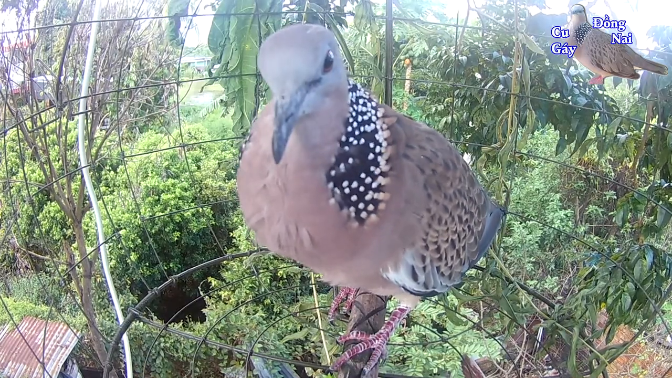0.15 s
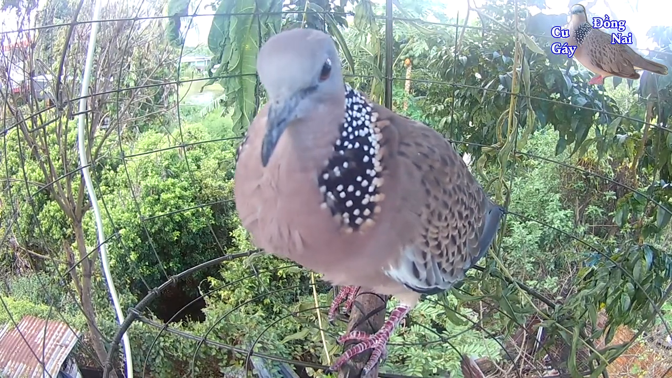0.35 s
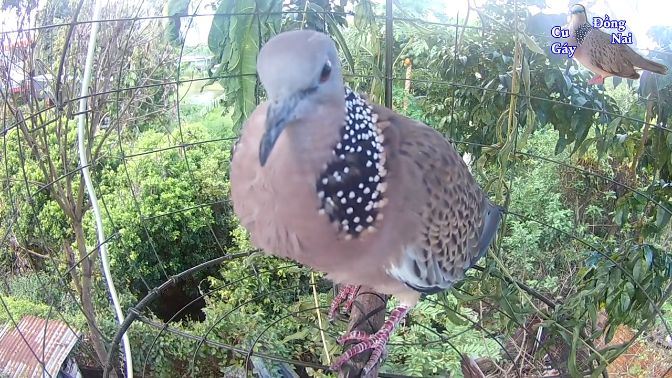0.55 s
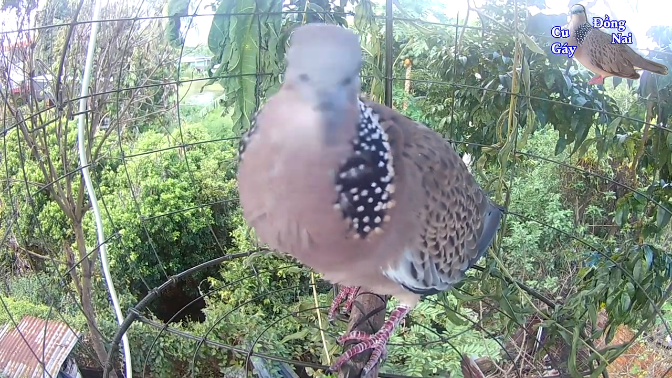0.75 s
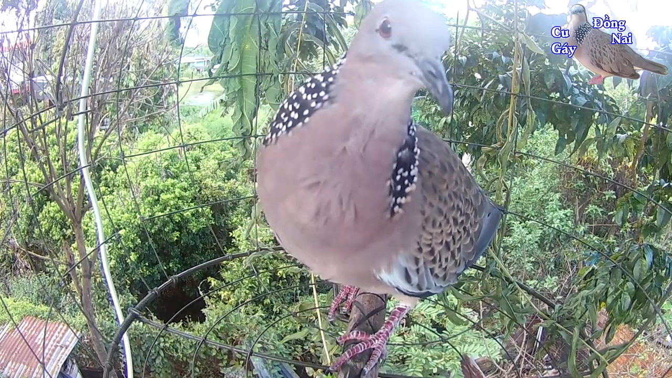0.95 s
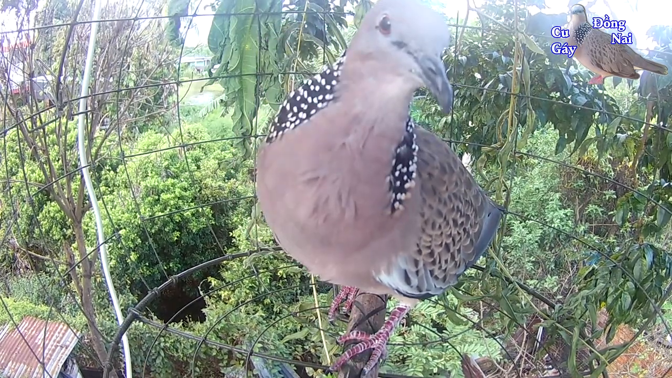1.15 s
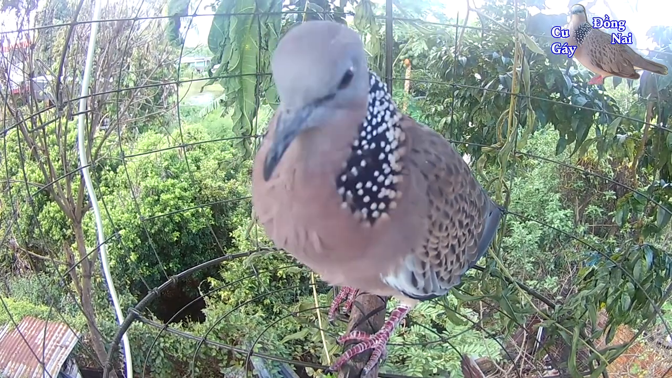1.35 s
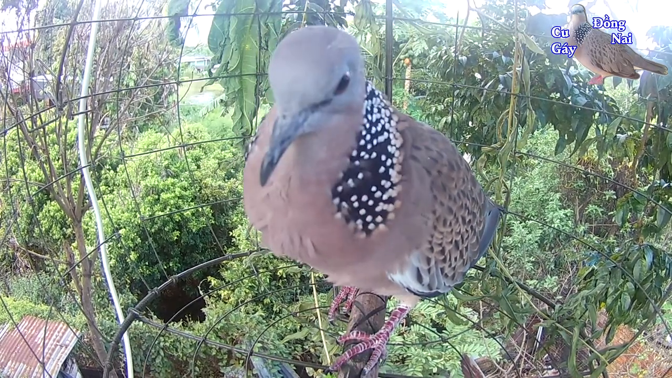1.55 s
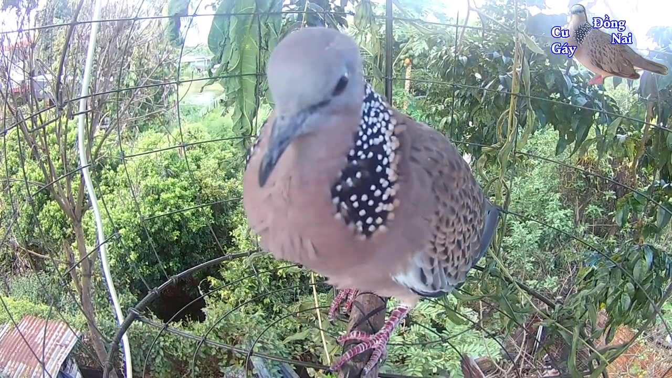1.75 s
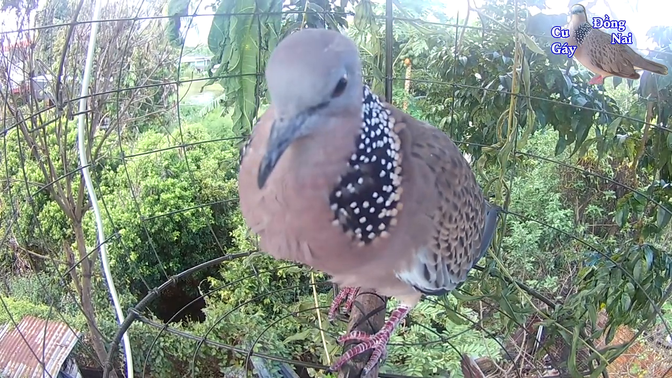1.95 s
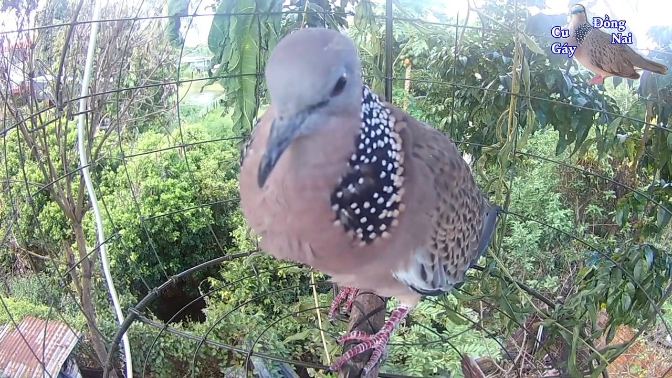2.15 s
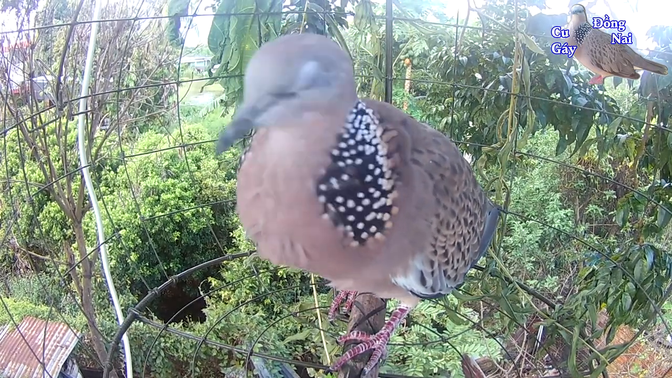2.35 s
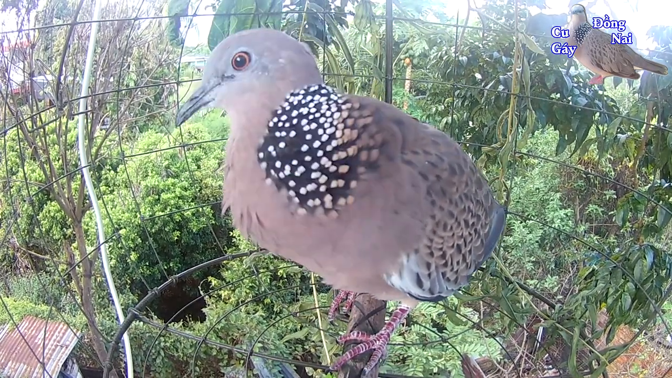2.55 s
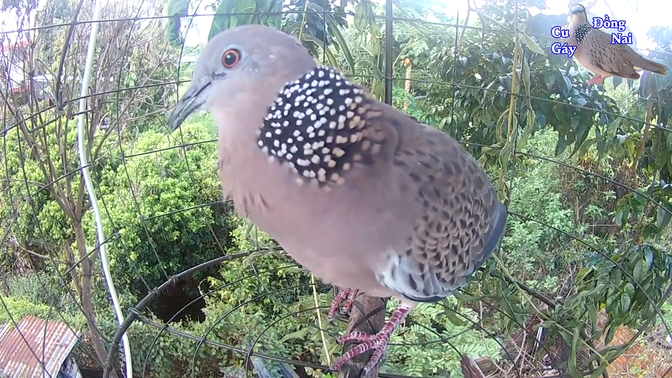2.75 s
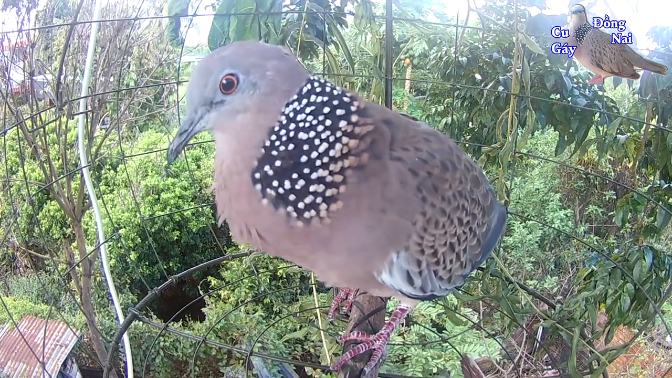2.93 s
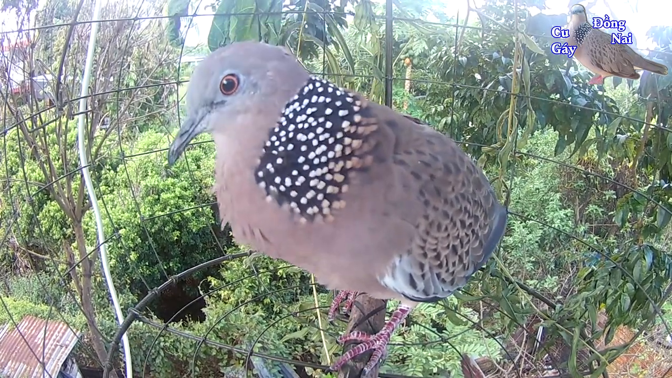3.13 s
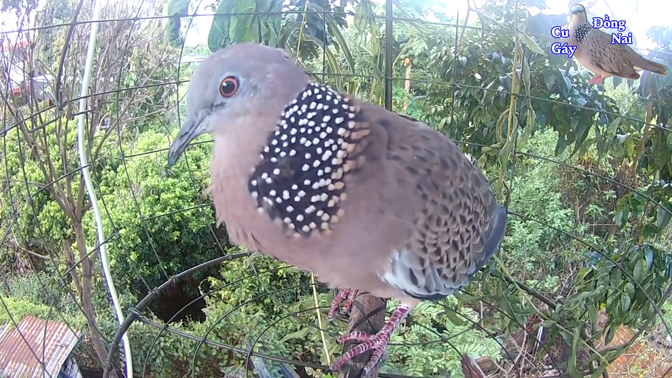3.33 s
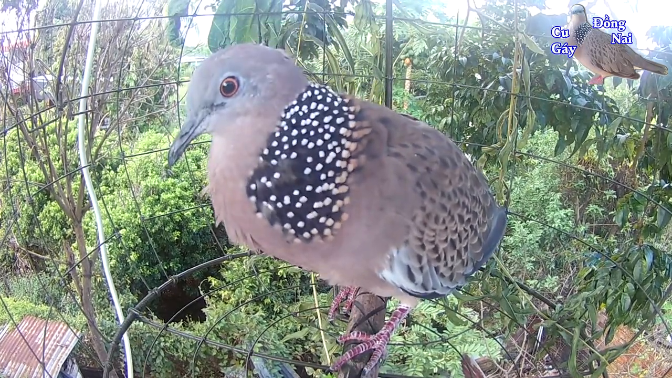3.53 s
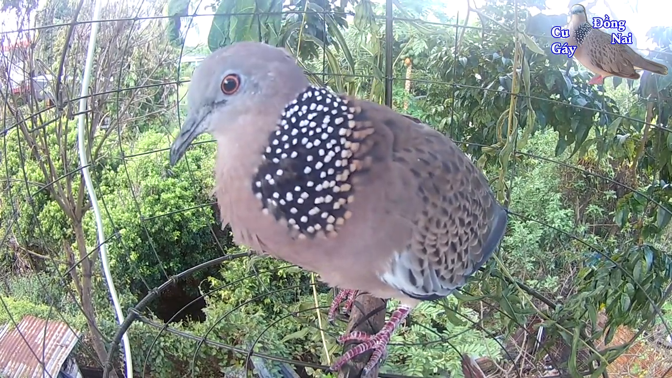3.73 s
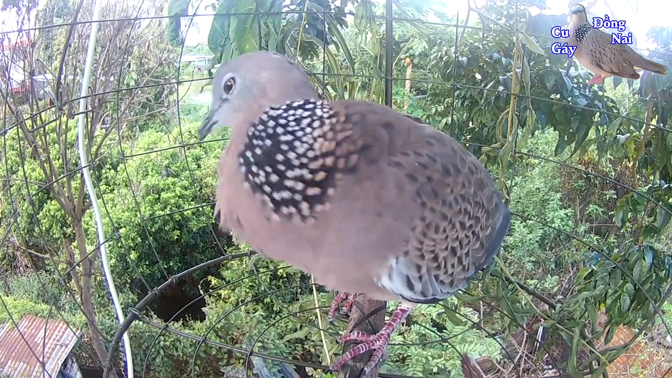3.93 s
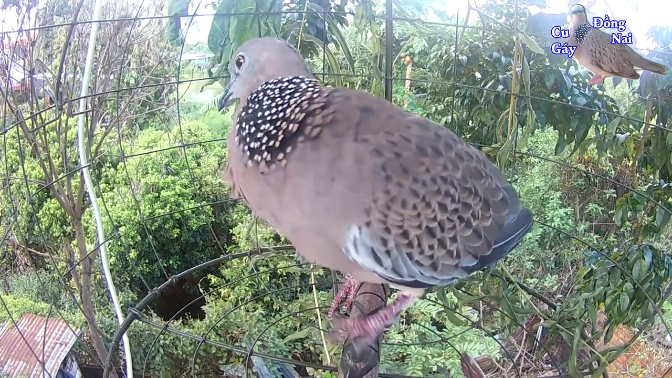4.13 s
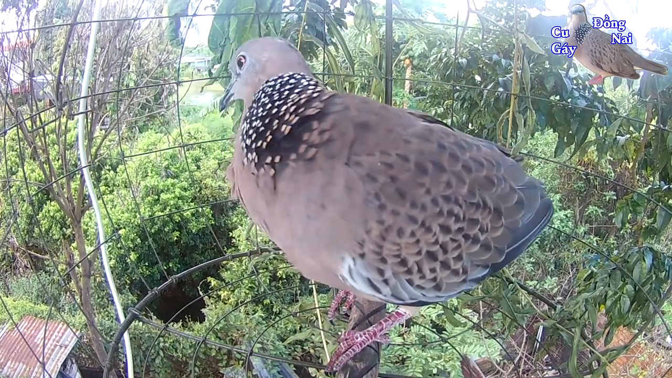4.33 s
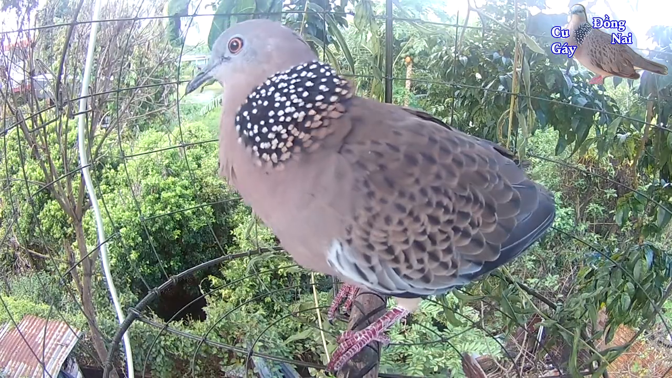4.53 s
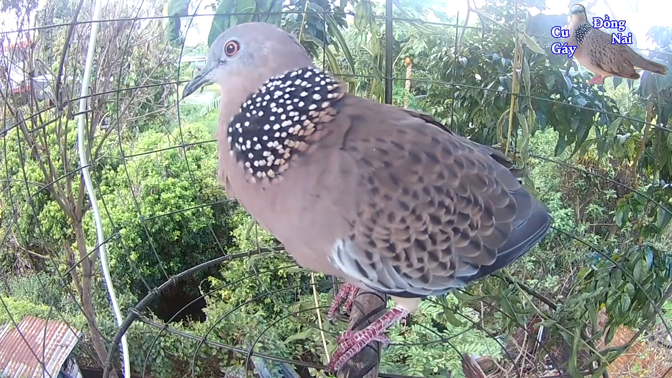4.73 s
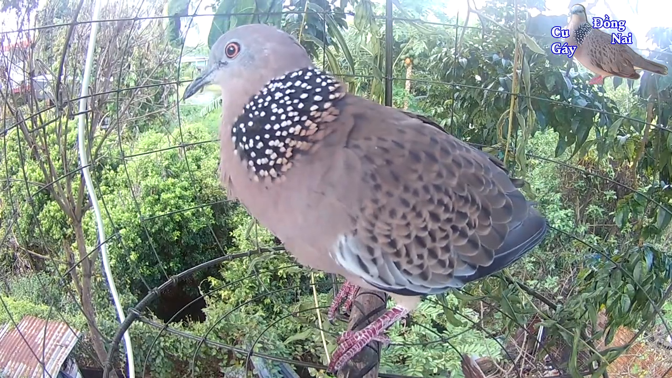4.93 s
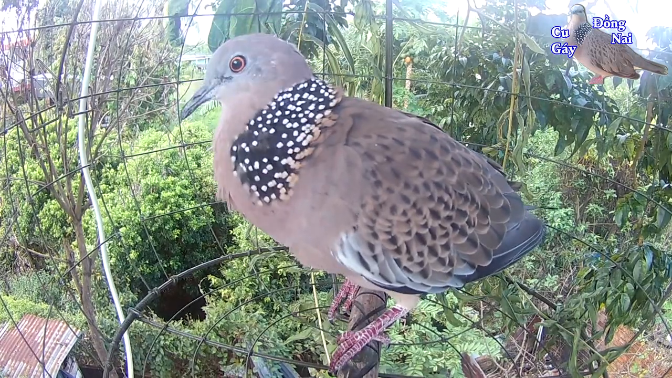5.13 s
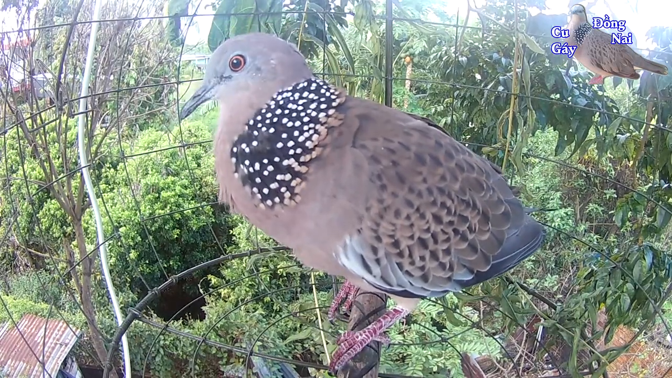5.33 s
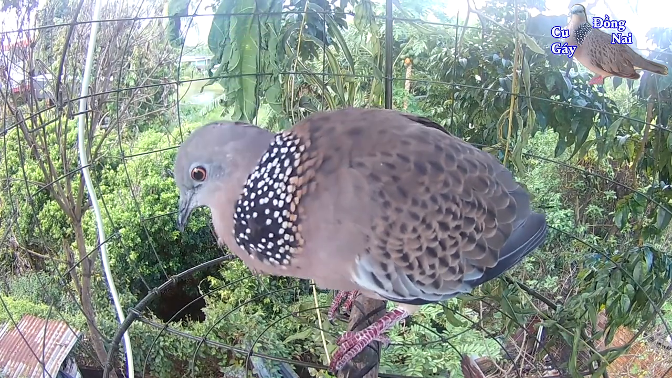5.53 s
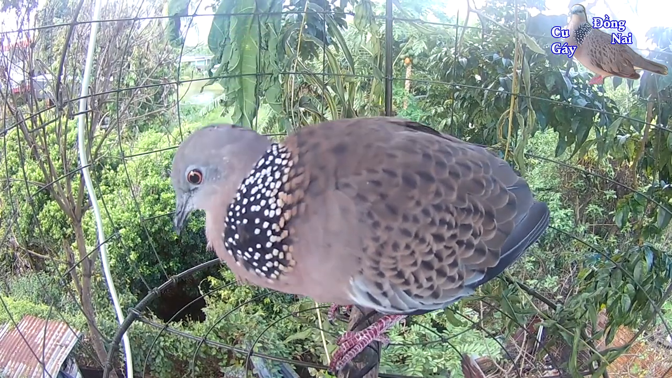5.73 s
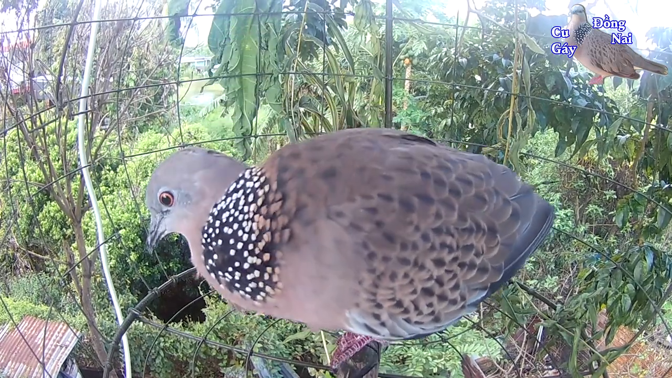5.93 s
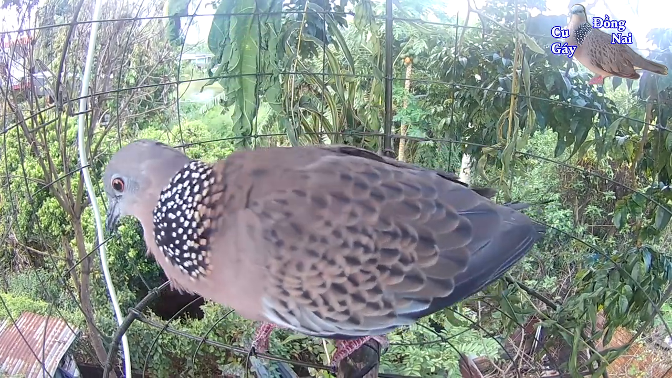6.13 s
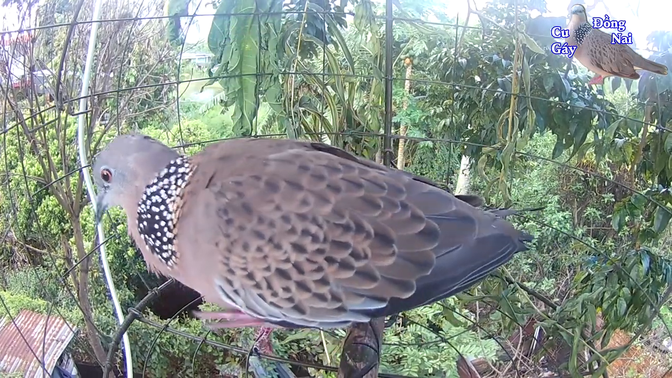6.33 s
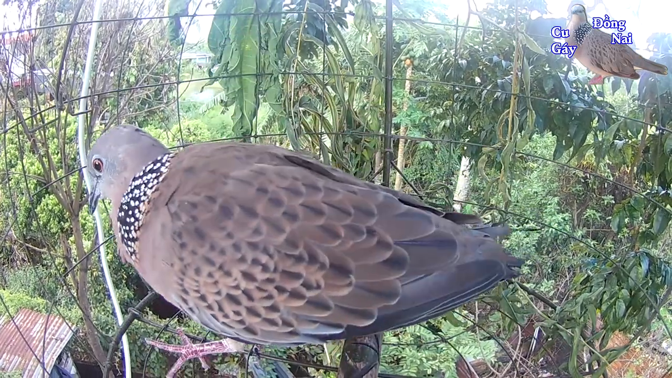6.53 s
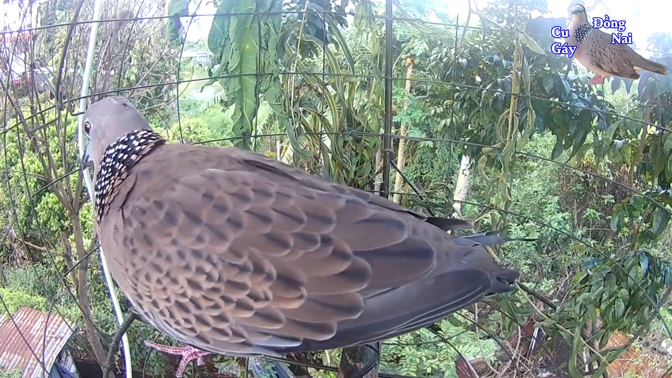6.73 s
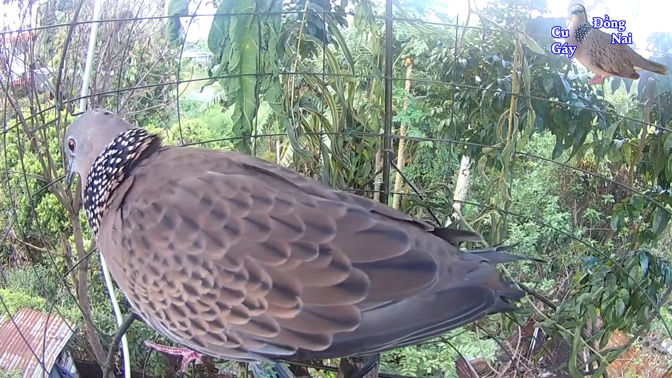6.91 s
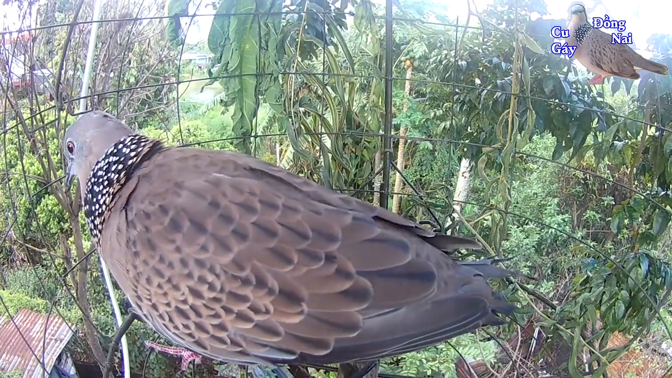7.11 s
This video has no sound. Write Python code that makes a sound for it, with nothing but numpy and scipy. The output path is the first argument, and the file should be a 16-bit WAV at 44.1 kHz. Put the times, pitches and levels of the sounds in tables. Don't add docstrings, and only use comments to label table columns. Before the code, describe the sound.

A spotted dove coos very close to the microphone, loud and hollow: a short hoot, a quick rising note, then a longer throbbing fall. The phrase repeats four times, the fourth softer, and a fifth starts at the end. Fainter doves answer in the gaps. Far off a cock crows hoarsely at the start and end. Feet tap the wooden perch and shake cage wires, over a soft hush of leaves and traffic.

```python
import sys
import numpy as np
from scipy import signal
from scipy.fft import rfft, irfft
from scipy.io import wavfile
from scipy.ndimage import uniform_filter1d

SR = 44100
rng = np.random.default_rng(int(sys.argv[2]) if len(sys.argv) > 2 else 0)


def transcribe(signal):
    frames = np.atleast_2d(signal).T
    limited = np.clip(frames, -1, 1)
    pcm = np.round(limited * 32767).astype(np.int16)
    wavfile.write(sys.argv[1], SR, pcm)


def rack_gain(trim_db):
    fader = np.asarray(trim_db, float)
    return 10 ** (fader / 20)


N = 316197
TIME = np.arange(N) / SR

# start t/s, length t/s, top pitch f/Hz, crest level/dB
HOOT_NOTES = [
    (-.122, 0.068, 605, -9),
    (1.324, 0.12, 603.9, -6),
    (2.822, 0.13, 610.4, -7),
    (4.548, .13, 595, -11),
    (6.868, .132, 622.4, -11.5),
]
# t/s, wood level/dB, wire level/dB
FOOT_KNOCKS = [(4.24, -9.5, -54), (4.266, -54, -52.5), (4.279, -67, -43), (4.303, -75, -55),
               (4.71, -66, -66.5), (4.87, -59, -62.5), (5.744, -48, -61.5), (5.956, -49, -53),
               (5.963, -66, -54.5), (6.032, -40, -67), (6.045, -33, -48), (6.059, -16.5, -26),
               (6.361, -48, -47), (6.504, -35, -83.5), (6.514, -31.5, -66), (6.758, -37, -66)]


def peak(x, hz, width_hz):
    r = np.exp(-np.pi * width_hz / SR)
    top = [(1 - r * r) / 2, 0, (r * r - 1) / 2]
    return signal.lfilter(top, [1, -2 * r * np.cos(2 * np.pi * hz / SR), r * r], x)


def edge_filter(x, order, hz, kind):
    return signal.sosfilt(signal.butter(order, hz, kind, fs=SR, output="sos"), x)


def rms_one(x):
    return x / np.sqrt(np.mean(x ** 2) + 1e-20)


def wobble(rate_hz):
    smooth = signal.butter(2, rate_hz, fs=SR, output="sos")
    return rms_one(signal.sosfilt(smooth, rng.standard_normal(N)))


def played(notes):
    s, hz, db = np.transpose(np.concatenate(notes))
    on = 0
    for note in notes:
        to_nearest_end = np.minimum(TIME - note[0][0], note[-1][0] - TIME)
        on = on + np.clip(to_nearest_end / .004 + .5, 0, 1)
    swell = uniform_filter1d(np.interp(TIME, s, rack_gain(db / 2)), size=300) ** 2
    pitch = uniform_filter1d(np.interp(TIME, s, hz), size=400)
    return pitch, np.minimum(on, 1) * swell


def throbs(at, dip_db, extra_db, rise_s, fall_s, scoop, scoop_s):
    inverted_lobe = .2
    at = np.r_[-9, at, 99]
    shut = np.r_[0, 1 - rack_gain(-np.abs(dip_db)), 0]
    k = np.searchsorted(at, TIME) - 1
    since, until, gap = TIME - at[k], at[k + 1] - TIME, at[k + 1] - at[k]
    rise = np.sin(np.pi / 2 * np.minimum(since / np.minimum(.6 * gap, rise_s), 1)) ** 1.9
    fall = np.sin(np.pi / 2 * np.minimum(until / np.minimum(.36 * gap, fall_s), 1)) ** 1.5
    gain = (1 - shut[k] * (1 - rise)) * (1 - shut[k + 1] * (1 - fall))
    deep = np.where(since < until, shut[k], shut[k + 1]) ** 3
    gain = gain - inverted_lobe * deep * (1 + 3 * gain) * (1 - gain) ** 2
    gain = gain * rack_gain(np.r_[0, extra_db][k] * np.clip(2 - since / .02, 0, 1))
    sharp = 0.24 * np.clip(2 - since / 0.015, 0, 1)
    sag = np.exp(-since / scoop_s)
    return gain, 1 + scoop * shut[k] * (sharp - sag)


def sung(rows, gesture):
    return [[(s + at * length, hz * share, db + under) for at, share, under in gesture]
            for s, length, hz, db in rows]


def closures():
    # first t/s, last t/s, rate f/Hz, first dip level/dB, last dip level/dB
    bouts = [(0.024, 0.116, 74, 17.5, 9.5), (.292, 0.37, 52, 15.5, 21.5), (.386, 0.449, 61.5, 19.5, 13.5),
             (0.47, 0.544, 67.5, 9.5, 4), (1.405, 1.441, 59, 7, 14), (1.455, 1.549, 76, 20, 8.5),
             (1.734, 1.782, 47.5, 23.5, 13), (1.797, 1.842, 66.5, 28, 16), (1.863, 1.905, 68, 16, 15),
             (1.927, 2.044, 68, 7.5, 3.5), (2.905, 2.964, 85, 5, 22), (2.980, 3.061, 75, 27, 7),
             (3.223, 3.301, 50.5, 24, 19.5), (3.319, 3.355, 79, 17, 19.5), (3.373, 3.431, 71.5, 23, 11),
             (3.455, 3.562, 65.5, 9, 3), (4.624, 4.716, 73.5, 6.5, 24), (4.729, 4.789, 78, 10.5, 7.5),
             (4.964, 5.007, 45.5, 23.5, 18), (5.023, 5.087, 63.5, 17, 17.5), (5.107, 5.26, 64.5, 13, 1),
             (6.949, 7.036, 81.5, 5, 15.5), (7.063, 7.112, 81.5, 15, 9)]
    uneven_s, uneven_dip = .0012, .22
    at = [np.array(HOOT_NOTES)[1:, 0] + 0.013]
    dip_db = [np.full(len(HOOT_NOTES) - 1, 6.5)]
    chances = rng.standard_normal((len(bouts), 2, 16))
    for (first, last, rate_hz, first_db, last_db), (early, deeper) in zip(bouts, chances):
        count = round((last - first) * rate_hz) + 1
        at.append(np.linspace(first, last, count) + uneven_s * early[:count])
        dip_db.append(np.linspace(first_db, last_db, count) * np.exp(uneven_dip * deeper[:count]))
    order = np.argsort(np.concatenate(at))
    return np.concatenate(at)[order], np.concatenate(dip_db)[order]


def throat(x):
    # f/Hz, width f/Hz, level/dB
    hollows = [(690, 410, -4), (1000, 350, -13)]
    x = sum((-1) ** k * rack_gain(db) * peak(x, hz, width) for k, (hz, width, db) in enumerate(hollows))
    x = edge_filter(x, 4, 403, "high")
    return signal.sosfilt(signal.ellip(6, .3, 30, 1191, fs=SR, output="sos"), x)


def near_dove():
    # start t/s, length t/s, top pitch f/Hz, crest level/dB
    rising_notes = [
        (0.0, 0.18, 659.6, -2),
        (1.443, .17, 690, -1.62),
        (2.95, 0.17, 685, -3),
        (4.68, .164, 641, -8),
        (7.024, .15, 741, -2.5),
    ]
    falling_notes = [
        (.283, 0.41, 709, -0.41),
        (1.712, .424, 723.7, -0.29),
        (3.217, .419, 706, -1.6),
        (4.943, 0.41, 716.3, -3.5),
    ]
    # share of length, share of top pitch, level under the crest/dB
    hoot_shape = [(0, .8, -38), (.07, .83, -20.5), (.15, .93, -3), (0.358, 0.98, 0), (.52, .88, -5.5),
                  (.72, .68, -16), (.86, .65, -26), (1, .67, -28)]
    rise_shape = [(0, .58, -33.5), (.2, .66, -28), (.4, .82, -7), (.7, .905, -0.5), (.81, 1.0, 0),
                  (.88, .94, -2), (.96, .7, -19.5), (1, .68, -33.5)]
    fall_shape = [(0, .74, -40.5), (.035, .76, -11.5), (.06, 0.83, -7.5), (0.09, 0.91, -0.5),
                  (.3, .935, -.5), (.65, .81, -6), (0.902, .7, -16.5), (.965, .6, -26), (1, 0.51, -42.5)]
    # t/s of the closure before, level/dB
    surges = [(.312, -.2), (.33, .45), (.35, -.2), (1.737, -.7), (1.76, 1.9)]
    # delay t/s, level/dB
    reflections = [(.021, -38), (.036, -27.5), (.058, -42), (.085, -55.5)]

    notes = sung(HOOT_NOTES, hoot_shape) + sung(rising_notes, rise_shape) + sung(falling_notes, fall_shape)
    hz, crest = played(sorted(notes))
    at, dip_db = closures()
    surge_db = -.8 * np.abs(rng.standard_normal(len(at)))
    for s, db in surges:
        surge_db[np.argmin(np.abs(at - s))] = db
    detune = np.minimum(dip_db / 12, 1) * rng.standard_normal(len(at)) + np.maximum(surge_db, 0)
    hz = hz * (1 + .025 * np.interp(TIME, at + .008, detune))
    gain, bend = throbs(at, dip_db, surge_db, rise_s=.011, fall_s=.006, scoop=0.69, scoop_s=0.0055)
    gain = gain * rack_gain(.25 * wobble(90))

    turn = 2 * np.pi * np.cumsum(hz * bend * (1 + 0.0064 * wobble(87))) / SR
    octave = rack_gain(-15.5) * (550 / hz) ** 3.1 * np.sin(2 * turn)
    leak = rack_gain(-14) * (1.5 - gain) * rng.standard_normal(N)
    membrane = gain * (np.sin(turn) + octave) + leak
    membrane[np.round(at * SR).astype(int)] += rack_gain(19.0) * (1 - rack_gain(-np.abs(dip_db)))

    click = np.eye(1, 8192)[0]
    response = np.abs(rfft(throat(click)))
    throat_gain = np.interp(hz * 8192 / SR, np.arange(len(response)), response)
    voice = throat(membrane * crest / throat_gain)
    voice = np.roll(voice, -round(0.0026 * SR))

    breath = peak(rng.standard_normal(N), 3800, 3500)
    voice += rack_gain(-65.5) * crest * (1 + gain) / 2 * rack_gain(2.7 * wobble(80)) * breath
    overtones = np.sin(2 * turn) + 0.29 * np.sin(3 * turn)
    voice += rack_gain(-52.0) * crest * gain * overtones
    echoes = sum(rack_gain(db) * np.r_[np.zeros(round(s * SR)), voice][:N] for s, db in reflections)
    return voice + peak(echoes, 690, 320)


def cock():
    # start t/s, swell t/s, fade t/s, f/Hz, crest level/dB
    partials = [(0, .166, .055, 1335, -41), (0, .03, .29, 1670, -60), (.16, .03, .12, 655, -37),
                (.19, .02, .03, 1150, -44), (.22, .04, .1, 1520, -47.5), (.24, .042, .04, 1318, -37),
                (.32, .245, .115, 1455, -47), (.95, .06, .11, 1320, -47), (6.595, .115, .07, 1420, -33),
                (6.595, .09, .06, 745, -37), (6.76, .03, .07, 1430, -46), (6.87, .05, .08, 1680, -39),
                (6.87, .06, .09, 830, -34), (6.93, .23, .09, 1520, -38), (6.94, .02, .3, 3050, -68),
                (7.08, .03, .06, 1240, -34.5)]
    # t/s, level/dB
    rasp_curves = [
        [(0, -45), (.04, -58.5)],
        [(.93, -61), (1.0, -62), (1.13, -65)],
        [(6.59, -67), (6.7, -71), (6.75, -45), (6.8, -49.5), (6.85, -77.5), (6.88, -44.5), (6.96, -43),
         (7.1, -45), (7.17, -37)],
    ]
    # f/Hz, width f/Hz, level/dB
    throat_peaks = [(410, 80, 4.5), (580, 110, 2.5), (760, 69, 10.5), (1120, 200, 6.5), (1353, 170, 3),
                    (1580, 140, 1), (2070, 140, -22.5), (2920, 200, -36)]
    onset_db, end_db, sag = -13.5, -14.5, 0.013
    out = 0
    for start, swell_s, fade_s, top_hz, db in partials:
        loudest = start + swell_s
        end = loudest + fade_s
        hz, level = played([[(start, top_hz * (1 + sag), db + onset_db),
                             (loudest, top_hz, db),
                             (end, top_hz * (1 - sag), db + end_db)]])
        tone = np.sin(2 * np.pi * np.cumsum(hz * (1 + .011 * wobble(60))) / SR)
        out = out + 1.41 * level * tone * (1 + 0.57 * wobble(82))
    hiss = rng.standard_normal(N)
    rasp = sum(rack_gain(db) * peak(peak(hiss, hz, width), hz, width) for hz, width, db in throat_peaks)
    level = played([[(s, 1, db) for s, db in part] for part in rasp_curves])[1]
    return out + level * rms_one(rasp) * rack_gain(2.6 * wobble(35))


def garden():
    # f/Hz, level per Hz/dB
    air = [(15, -25.5), (25, -8), (129, -13.5), (323, -16.5), (445, -15.5), (553, -16), (805, -21.5),
           (873, -19), (1340, -16.5), (2780, -37.5), (4160, -37.5), (7130, -54), (11300, -53.5),
           (12500, -67.5), (15600, -47)]
    # f/Hz, level/dB, width f/Hz
    hum_bands = [(46, -79, 20), (94, -65.5, 11), (121, -69, 13), (195, -74.5, 14)]
    hz = np.maximum(np.arange(N // 2 + 1) * SR / N, 1)
    air_hz, air_db = np.transpose(air)
    colour = rack_gain(np.interp(np.log(hz), np.log(air_hz), air_db))
    hush = rms_one(irfft(rfft(rng.standard_normal(N)) * colour, N))
    out = rack_gain(-59 + 0.33 * wobble(2)) * hush
    for hum_hz, db, width in hum_bands:
        hum = peak(peak(rng.standard_normal(N), hum_hz, width), hum_hz, width)
        out = out + rack_gain(db + 0.83 * wobble(4.5)) * rms_one(hum)
    return out


def far_doves():
    # start t/s, throbbing part t/s, clear part t/s, pitch f/Hz, crest level/dB
    coos = [
        (0.689, .345, .165, 736.3, -46),
        (2.195, .19, .23, 687.6, -43),
        (3.63, .03, 0.09886, 760, -47),
        (3.85, .28, .18, 728, -48.5),
        (5.519, .08, 0.24, 804, -60.5),
        (5.901, 0.0278, 0.111, 740, -54.5),
        (6.118, 0.0747, 0.276, 741.7, -53.5),
    ]
    # stage (0 start, 1 clears, 2 end), share of pitch, level under the crest/dB
    coo_shape = [(0, .93, -16.5), (.25, 0.95, -8.5), (.9, .95, -10), (1.25, .94, -1.5), (1.7, .87, -12),
                 (2.001, .85, -24.5)]
    notes = []
    for row in coos:
        stages = np.cumsum(row[:3])
        notes.append([(np.interp(at, range(3), stages), row[3] * share, row[4] + under)
                      for at, share, under in coo_shape])
    hz, level = played(notes)
    at = np.cumsum(.0182 * (1 + .13 * rng.standard_normal(420)))
    gain, bend = throbs(at, np.full(420, 25.), 2.5 * rng.standard_normal(420),
                        rise_s=.011, fall_s=.005, scoop=.45, scoop_s=.005)
    note = np.searchsorted([row[0] for row in coos[1:]], TIME)
    clears = np.array(coos)[note, :2].sum(axis=1)
    depth = np.clip((clears - TIME) / .04 + .5, .33, 1)
    tone = np.sin(2 * np.pi * np.cumsum(hz * (1 + depth * (bend - 1) + .012 * wobble(30.2))) / SR)
    coo = 3.36 * level * tone * (1 + depth * (1.49 * gain - 1)) * rack_gain(1.7 * wobble(37))
    delays = rng.uniform(.008, .09, 12)
    return coo + sum(rack_gain(-9 - 130 * s) * np.roll(coo, round(s * SR)) for s in delays)


def struck(db, modes, rattle_s, rattle_db):
    out, fade = np.zeros(N), np.exp(-1 / (rattle_s * SR))
    at = [round(row[0] * SR) for row in FOOT_KNOCKS]
    for hz, mode_db, t60 in modes:
        blow = np.full(N, 1e-18)
        blow[at] = rack_gain(db + mode_db + 3 * rng.standard_normal(len(at)))
        rattle = signal.lfilter([1], [1, -fade], blow) * rng.standard_normal(N)
        blow += rack_gain(rattle_db) * rattle
        r, w = rack_gain(-60 / (t60 * SR)), 2 * np.pi * hz / SR
        out += signal.lfilter([0, np.sin(w)], [1, -2 * r * np.cos(w), r * r], blow)
    return out


def perch():
    # f/Hz, level/dB, time to fall 60 dB t/s
    wood_modes = [(390, -31.5, 0.08), (592, -7, 0.18), (620, -7.5, 0.23), (690, 4.5, 0.012),
                  (790, -16, 0.14), (952, -30.5, 0.028), (1360, -8, 0.065)]
    wire_modes = [(1720.5, 1.5, 0.042), (2080, 5, 0.0078), (2770, 1, 0.019), (3800, -25, 0.054),
                  (3940, -6, 0.016), (4237, -6, 0.035), (4840, 4, 0.018), (5200, -9.5, 0.012)]
    _, wood_db, wire_db = np.transpose(FOOT_KNOCKS)
    wood = struck(wood_db - 3, wood_modes, rattle_s=.028, rattle_db=-30)
    wood = edge_filter(wood, 4, [360, 1150], "band")
    wood = 1.09 * peak(wood, 532, 554)
    wood = np.roll(wood, round(.002 * SR))
    wire = struck(wire_db - 8, wire_modes, rattle_s=0.011, rattle_db=-17.5)
    return wood + edge_filter(wire, 2, [1300, 6200], "band")


def scene():
    return (near_dove() + cock() + garden() + far_doves() + perch())[None]


def top_cut(x):
    return signal.sosfilt(signal.butter(12, 15710, fs=SR, output="sos"), x)


def record(dry):
    return top_cut(np.clip(dry, -.99, .99))


dry = scene()
out = record(dry)
transcribe(out)
```